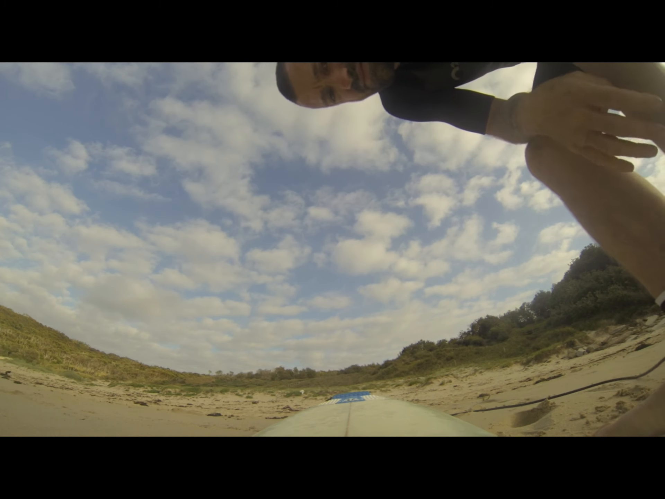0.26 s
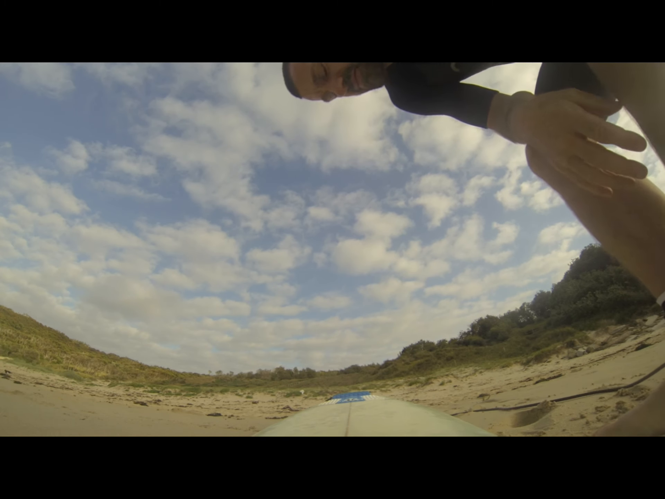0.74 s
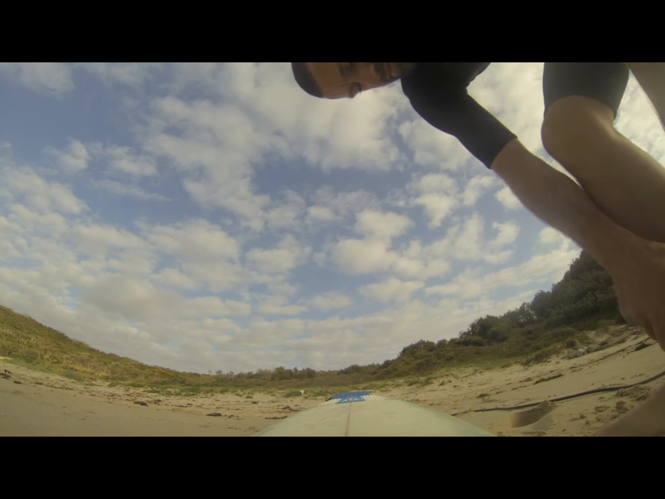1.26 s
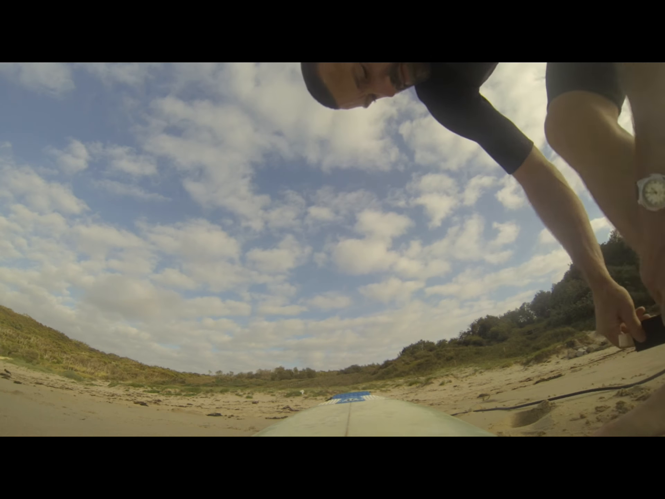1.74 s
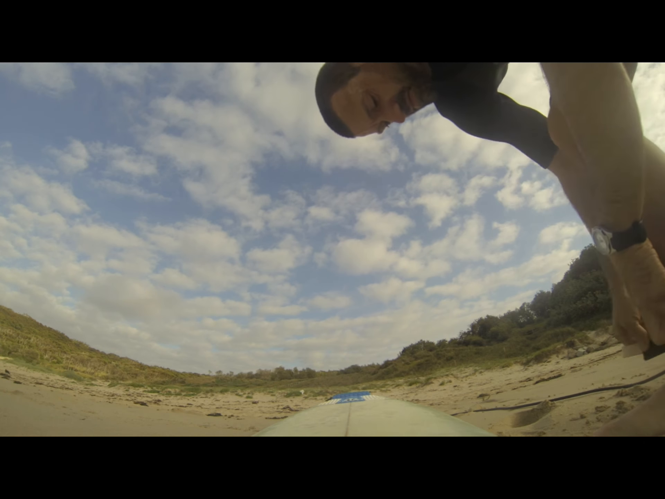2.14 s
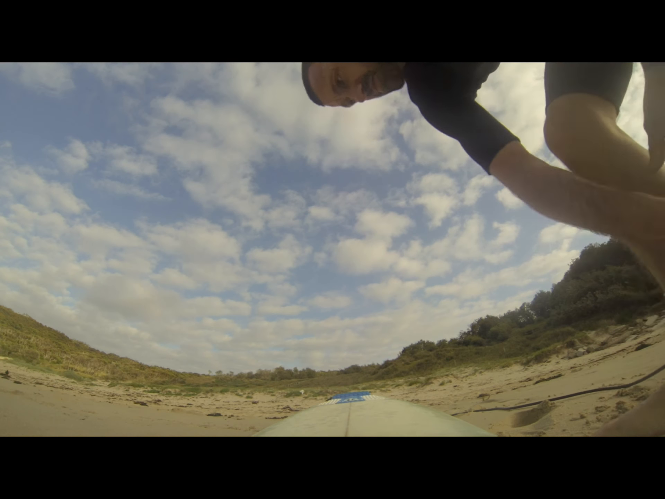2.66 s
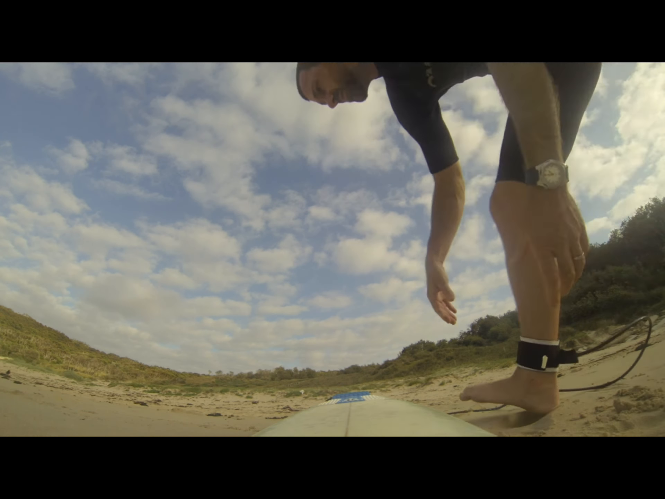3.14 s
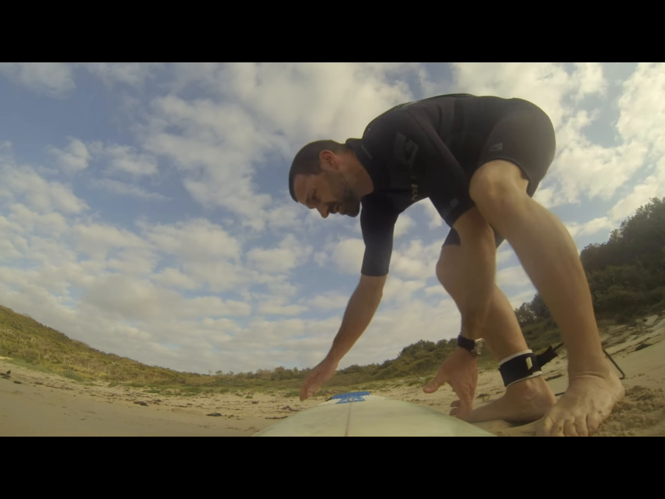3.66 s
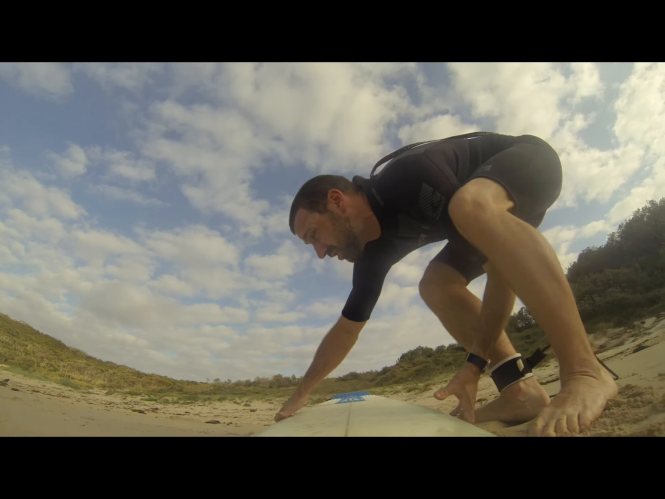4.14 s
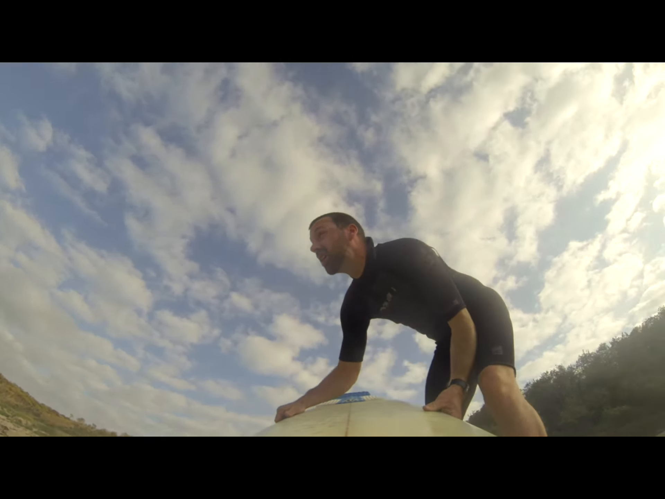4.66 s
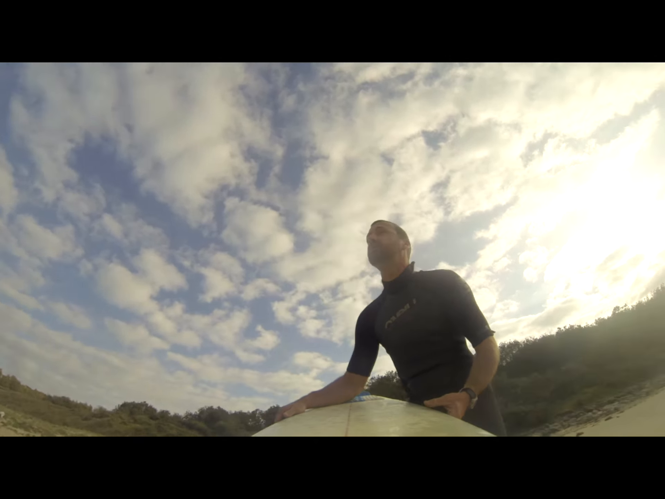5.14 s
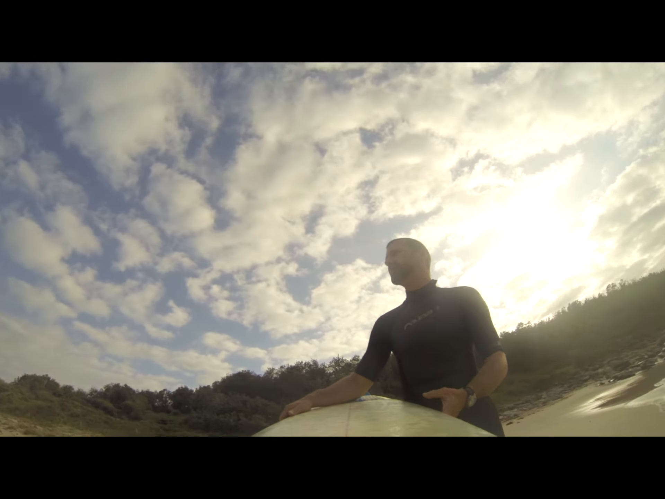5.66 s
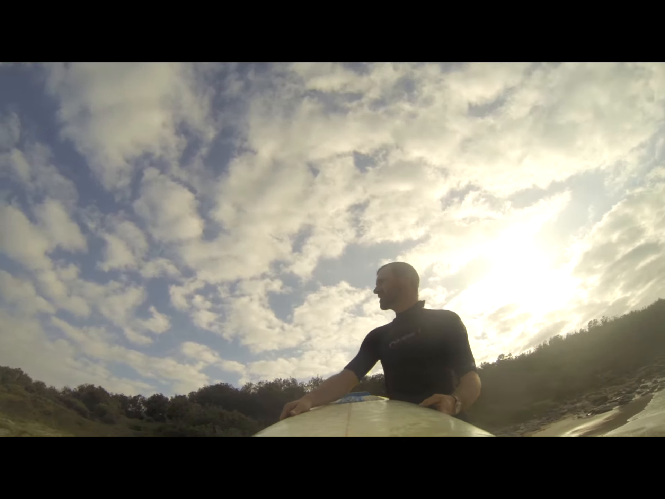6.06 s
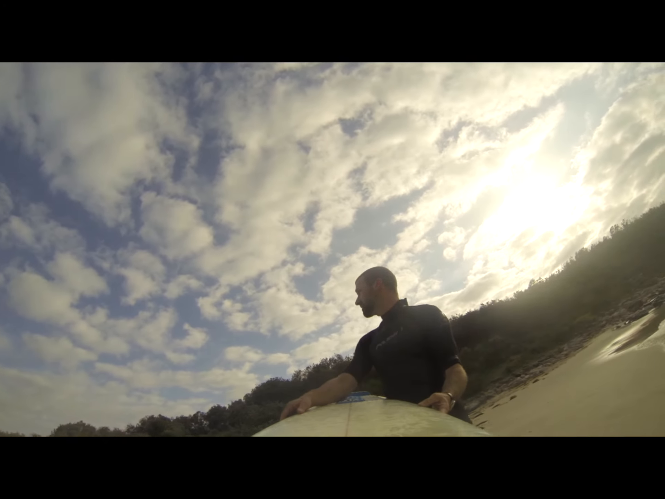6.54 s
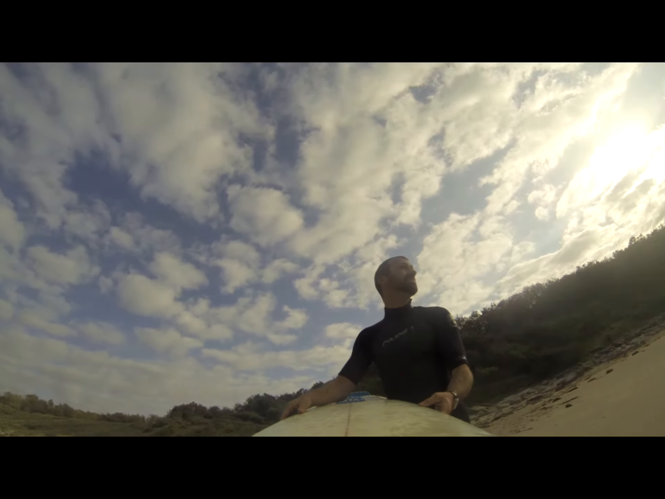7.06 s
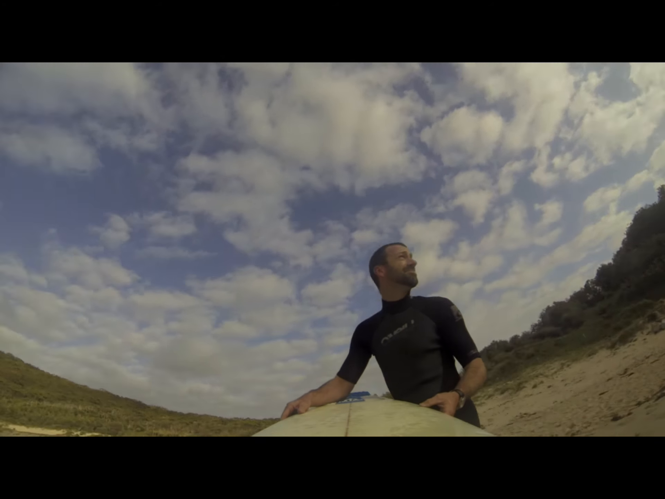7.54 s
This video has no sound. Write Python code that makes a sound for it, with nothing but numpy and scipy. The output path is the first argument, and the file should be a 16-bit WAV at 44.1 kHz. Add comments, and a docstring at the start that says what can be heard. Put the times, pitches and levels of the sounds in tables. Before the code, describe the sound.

Hollow knocks, booming bumps, scrapes and skin squeaks come through a handled surfboard, with low rumble and dull surf behind.

```python
"""First comes a low rumble and a dull wave: a surfboard shakes in the breeze beside the sea.
The surfer fastens his leash with a rasp, lifts the board off the sand and carries it along the surf.
A camera in a sealed case rides on the board, so the waves are muffled, while every bump, knock, scrape
and squeak of the hands comes through loudly. Near the end, a hand rubs and judders on the board.
The hardest hits make the camera's limiter turn everything down for a moment."""
import sys
import numpy as np
from scipy import signal
from scipy.fft import rfft, irfft
from scipy.io import wavfile
from scipy.ndimage import uniform_filter1d, minimum_filter1d

SR = 44100
rng = np.random.default_rng(int(sys.argv[2]) if len(sys.argv) > 2 else 0)


def master_out(mix):
    """Clip the mix to full scale and print it as 16-bit PCM to the path in sys.argv[1]."""
    frames = np.transpose(np.atleast_2d(mix))
    ceiling = np.clip(frames, -1, 1)
    pcm = np.round(ceiling * 32767).astype(np.int16)
    wavfile.write(sys.argv[1], SR, pcm)


N = 343980
TIME = np.arange(N) / SR
FREQS = np.fft.rfftfreq(N, 1 / SR)

# the board shakes in a dying breeze, lies still, then is carried: t/s, level/dB
RUMBLE_LEVELS = [(0, -31), (0.9, -31.5), (1.9, -47), (4.3, -46.5), (4.6, -22.5), (7.8, -30.5)]
# tone colour of that shaking: f/Hz, level/dB
RUMBLE_COLOUR = [(15, 5.5), (30, -11.5), (40, 7.5), (50, -10), (61, -1.5), (75, 12), (92, -11.5), (116, -9),
                 (150, -25.5), (220, -27), (400, -71)]
# breaking waves: crest t/s, rise/s, fall/s, foam lag/s, roar level/dB, wash level/dB, foam level/dB
BREAKERS = [(0.35, 0.45, 0.87, 0.35, -36.5, -45, -58.5), (5.2, 0.43, 0.6, 0.42, -32, -32, -61),
            (6.45, 0.56, 0.76, 0.1, -45.5, -41.5, -64.5), (7.33, 0.5, 0.44, 0.32, -31.5, -37, -60.5)]
# tone colour of the muffled sea: f/Hz, level/dB
SEA_COLOUR = [(140, -1.5), (250, 1.5), (340, -4), (490, 0.5), (660, -7.5), (950, -10.5), (1330, 1),
              (1600, -1.5), (1850, -8), (2400, -18), (3050, -18), (3550, -27), (5100, -31.5), (5800, -36.5),
              (7600, -37.5), (9000, -44.5), (13800, -54), (14800, -51.5)]
# knocks coming through the camera mount: t/s, peak level/dB, tilt/(dB per octave)
MOUNT_KNOCKS = [(0.527, -27, -7), (3.648, -31.5, 1), (3.698, -23.5, 5.5), (3.866, -26.5, 1),
                (3.957, -18, -0.5), (4.133, -14, 1), (4.206, -10.5, -2), (4.27, -11.5, -5.5),
                (4.642, -11, -3.5), (4.931, -11.5, -0.5), (5.092, -9.5, -1.5), (5.475, -6.5, -4),
                (5.955, -10.5, -7), (6.0447, 7, -3.5), (6.712, -8.5, -5)]
# tone colour of the sealed case: f/Hz, level/dB
CASE_COLOUR = [(60, 1.5), (190, -13.5), (380, -1.5), (650, -2), (860, -12.5), (1100, -7), (1400, 7.5),
               (1750, -4.5), (2100, -12), (3100, -25), (3700, -31.5), (7500, -50.5), (11000, -56.5),
               (15000, -70.5)]
# pitches at which the case rings: f/Hz, width/Hz, boost/dB
CASE_RINGS = [(261.6, 33, 13.5), (390, 23, 8.5), (530, 45, 7), (690, 19, 7), (1244, 45, 4.5),
              (1530, 33, 2.5), (1911, 50, 9.5), (2610, 270, 5.5), (2970, 770, 1), (5400, 400, 1)]
# rasps of the leash's hook-and-loop cuff: t/s, length/s, level/dB
CUFF_RASPS = [(1.291, 0.25, -42), (1.512, 0.27, -41.5), (1.624, 0.071, -41.5), (1.766, 0.039, -46.5),
              (1.807, 0.026, -44.5), (2.312, 0.024, -57.5), (2.44, 0.074, -53), (2.535, 0.025, -57)]
# tone colour of the hooks letting go: f/Hz, level/dB
CUFF_COLOUR = [(700, -49), (1400, 14.5), (2000, 7), (3100, 9), (3700, -4), (5000, -0.5), (7500, -6),
               (10000, -13), (14000, -22), (16000, -28)]
# bumps on the board: t/s, push level/dB, push f/Hz, ring level/dB
BOARD_BUMPS = [(3.219, -23.5, 65, -21.5), (3.658, -18, 62.2, -15), (3.898, -12, 33, -6.5),
               (3.952, -0.5, 25, -6.5), (4.075, 2, 53, 0), (4.214, 2.5, 50.6, -5.5),
               (4.268, 6.5, 60.5, -0.5), (4.716, -22, 54.4, -2), (5.158, -2.5, 62.7, -10),
               (6.03, 0, 51.4, -9.5), (6.106, 0, 66.5, -1.5), (6.747, -18, 44.5, -8.5),
               (6.884, 4.5, 64.4, 4), (7.173, -17, 44.5, -11), (7.63, -22, 58.4, -6)]
# low notes of the bending board: f/Hz, time to fade by 60 dB/s, level/dB
BOARD_NOTES = [(48.94, 0.88, 0.5), (75.47, 0.58, -1), (117, 0.31, -9.5)]
# sand and hands scraping the board: t/s, length/s, level/dB, tilt/(dB per octave)
BOARD_SCRAPES = [(3.638, 0.095, -40, -14), (3.712, 0.043, -39, 8), (3.89, 0.1, -33.5, -3.5),
                 (4.031, 0.16, -30.5, 1), (4.119, 0.13, -23, -6.5), (4.73, 0.0348, -23.5, -2),
                 (5.039, 0.075, -24.5, 4), (5.123, 0.127, -26, -14.5), (5.412, 0.047, -24.5, -8),
                 (5.939, 0.15, -28, -4), (6.857, 0.072, -21.5, -3), (6.945, 0.079, -20.5, -2.5),
                 (7.001, 0.16, -18, -3.5)]
# skin squeaking on the deck: t/s, length/s, first f/Hz, middle f/Hz, last f/Hz, level/dB, roughness 0-1
SKIN_SQUEAKS = [(4.641, 0.055, 480, 442, 433, -25.5, 0.41), (5.087, 0.023, 1500, 1500, 1410, -18, 0.36),
                (5.09, 0.21, 600, 305, 251.3, -19, 0.45), (7.056, 0.072, 686.5, 707, 690, -17, 0.21),
                (7.144, 0.0608, 735, 672, 766, -17, 0.15), (7.202, 0.0267, 1295, 1466, 1630, -13, 0.28)]
# a hand juddering on the board: t/s, length/s, level/dB
HAND_RUBS = [(6.664, 0.0844, -21), (6.758, 0.05, -32), (7.389, 0.065, -29.5), (7.63, 0.2, -21),
             (7.678, 0.046, -19)]
# tone colour of those rubs: f/Hz, level/dB
RUB_COLOUR = [(110, 0.5), (190, -12), (400, 4), (690, -2), (860, -13), (1100, -4), (1450, -1.5),
              (1850, -19), (2200, -26), (4000, -68)]


def amp(db):
    """Turns decibels into a number to multiply a sound by."""
    return 10 ** (np.asarray(db) / 20)


def unit(x):
    """Scales a signal to an average strength (rms) of 1."""
    return x / np.sqrt(np.mean(x ** 2) + 1e-20)


def colour_db(colour, hz):
    """Looks up levels in a tone colour table, sliding smoothly between its rows."""
    row_hz, row_db = np.transpose(colour)
    return np.interp(np.log(hz + 1), np.log(row_hz), row_db)


def coloured(x, colour):
    """Gives a sound the tone colour of a table."""
    return unit(irfft(rfft(x) * amp(colour_db(colour, FREQS)), N))


def band(x, low_hz, high_hz):
    """Keeps what lies between two frequencies."""
    cut = (1 + (low_hz / (FREQS + 1)) ** 12) * (1 + (FREQS / high_hz) ** 12)
    return irfft(rfft(x) / np.sqrt(cut), N)


def wobble(rate_hz):
    """A smooth random curve that wanders up to about this fast."""
    return unit(irfft(rfft(rng.standard_normal(N)) / (1 + (FREQS / rate_hz) ** 4), N))


def clicks(per_s, spread_db):
    """Random clicks of uneven size."""
    size = amp(spread_db * np.minimum(rng.exponential(1, N), 4))
    return size * rng.choice([-1, 1], N) * (rng.random(N) < per_s / SR)


def burst(x, start, length, db, taper):
    """A short piece of a sound at a set level; taper is the share spent fading in and out."""
    part = x[round(start * SR):][:round(length * SR)]
    return amp(db) * unit(part * signal.windows.tukey(len(part), taper))


def add(mix, start, sound):
    """Mixes a sound in at a start time in seconds."""
    part = mix[max(round(start * SR), 0):][:len(sound)]
    part += sound[:len(part)]


def rumble(buffet_db=1.3):
    """The board shudders unevenly in the wind and in the surfer's grip."""
    level_db = np.interp(TIME, *np.transpose(RUMBLE_LEVELS)) + buffet_db * wobble(rate_hz=6)
    return coloured(rng.standard_normal(N), RUMBLE_COLOUR) * amp(level_db)


def case_echo(x, echo, notch_hz=895):
    """Sound from the air meets its upside-down echo in the case, which dips evenly spaced pitches."""
    reflection = echo / (1 + (FREQS / 9000) ** 4) * np.exp(-2j * np.pi * FREQS / notch_hz)
    return irfft(rfft(x) * (1 - reflection), N)


def swell(far_db, crests_db, lags, rise_stretch=1, drop_db=10):
    """A loudness curve: each wave builds to its crest and dies away over the steady, distant surf."""
    power = amp(far_db) ** 2
    for (crest, rise, fall, *_), db, lag in zip(BREAKERS, crests_db, lags):
        t = TIME - crest - lag
        from_crest = abs(t) / np.where(t < 0, rise * rise_stretch, fall)
        power = power + amp(db - drop_db * from_crest ** 2.02) ** 2
    return np.sqrt(power)


def sea():
    """Waves break: a low wash and a roar, then spray, and last the hiss of foam."""
    *_, foam_lags, roar_db, wash_db, foam_db = np.transpose(BREAKERS)
    no_lag = np.zeros(len(BREAKERS))
    water = case_echo(coloured(rng.standard_normal(N), SEA_COLOUR), echo=0.3)
    wash_churn, roar_churn, hiss_churn = amp(1.4 * wobble(20)), amp(.9 * wobble(24)), amp(.6 * wobble(25))
    wash = unit(band(water, 85, 810)) * swell(-50, wash_db, no_lag)
    roar = unit(band(water, 870, 2370)) * swell(-54, roar_db, no_lag)
    spray = unit(band(water, 2500, 4320)) * swell(-69.5, foam_db + 5, 0.3 * foam_lags, rise_stretch=1.4)
    foam = unit(band(water, 4650, 16000)) * swell(-75.5, foam_db, foam_lags, rise_stretch=1.4)
    return wash * wash_churn + roar * roar_churn + (spray + foam) * hiss_churn


def electronics(whine_hz=10645):
    """The camera's own faint whine and hiss."""
    whine = amp(-81) * np.sin(2 * np.pi * whine_hz * TIME)
    hiss = amp(-74) * unit(band(rng.standard_normal(N), 200, 10000))
    return whine + hiss


def case_ring(tilt_db, size=4096):
    """How the case rings after one sharp tap; a higher tilt (dB per octave) makes it brighter."""
    hz = np.fft.rfftfreq(size, 1 / SR)
    peaks_db = sum(boost / (1 + (2 * (hz - f) / width) ** 2) for f, width, boost in CASE_RINGS)
    octaves = np.log2(np.clip(hz, 300, 6000) / 1000)
    db = colour_db(CASE_COLOUR, hz) + peaks_db + tilt_db * octaves
    log_gain = np.log(amp(np.r_[db, db[-2:0:-1]]))
    spectrum = np.exp(np.conj(signal.hilbert(log_gain)))  # puts all the ringing after the tap
    return np.fft.ifft(spectrum).real[:size // 2]


def knocks(rattle=0.18, rattle_s=0.0031, slip_db=-13.5, slip_s=0.0045):
    """The grip slips, then the mount clicks and briefly rattles; all of it rings the case."""
    out, t = np.zeros(N), np.arange(-1024, 1024) / SR
    chatter = rattle * np.where(t < 0, amp(slip_db) * np.exp(t / slip_s), np.exp(-t / rattle_s))
    for start, db, tilt_db in MOUNT_KNOCKS:
        contact = (t == 0) + chatter * rng.standard_normal(len(t))
        knock = signal.fftconvolve(contact, case_ring(tilt_db))
        add(out, start + t[0], amp(db) * knock / abs(knock).max())
    return out


def cuff():
    """The leash cuff rasps as its tiny hooks let go in clumps."""
    hooks = clicks(per_s=3000, spread_db=2.7) * amp(2.4 * wobble(90))
    snaps = case_echo(coloured(hooks, CUFF_COLOUR), echo=0.42)
    out = np.zeros(N)
    for start, length, db in CUFF_RASPS:
        add(out, start, burst(snaps, start, length, db, taper=0.55))
    return out


def bumps(slow_hz=31.4, quick_hz=68.6):
    """Bumps and steps push the board, which springs back and rings: low if slow, higher if quick."""
    out, t = np.zeros(N), TIME[:SR]
    lowest, *upper = (amp(db - 60 * t / fade_s) * np.sin(2 * np.pi * hz * t)
                      for hz, fade_s, db in BOARD_NOTES)
    fade_in = 1 - np.exp(-t / 0.025)
    for start, push_db, push_hz, ring_db in BOARD_BUMPS + steps():
        cycles = t * push_hz
        push = np.sin(2 * np.pi * cycles) * (2 * cycles * np.exp(1 - 2 * cycles)) ** 2
        push = (push + push ** 3) / 1.5  # the push stiffens at its peaks
        quickness = np.clip((push_hz - slow_hz) / (quick_hz - slow_hz), 0, 1)
        ring = fade_in * ((1 - quickness) * lowest + quickness * sum(upper))
        add(out, start, amp(push_db) * push + amp(ring_db) * ring)
    return out


def overload_ticks(delay_s=0.0026, length_s=0.018, below_push_db=38.5):
    """A bright, brief crackle as a bump overloads the camera: the harder the push, the louder."""
    out = np.zeros(N)
    crackle = signal.fftconvolve(clicks(per_s=1500, spread_db=3), case_ring(tilt_db=13))
    for start, push_db, *_ in BOARD_BUMPS:
        add(out, start + delay_s, burst(crackle, start, length_s, push_db - below_push_db, taper=0.65))
    return out


def scrapes(swell_db=6.5):
    """Many tiny slips ring the case, growing louder as the hand presses; soft skin sounds duller."""
    out, slips = np.zeros(N), band(clicks(per_s=2400, spread_db=2.5), 110, 4640)
    for start, length, db, tilt_db in BOARD_SCRAPES:
        rub = burst(slips, start, length, db=0, taper=0.35)
        pressure = amp(np.linspace(0, swell_db, len(rub)))
        scrape = signal.fftconvolve(rub * pressure, case_ring(tilt_db))
        strength = np.sqrt(np.sum(scrape ** 2) / (length * SR))
        add(out, start, amp(db) * scrape / strength)
    return out


def squeaks(soft_hz=1750, rise_db=1):
    """Skin sticks and slips fast enough to make a shaky, gliding note; the case colours its overtones."""
    out, jitter, flutter, ring = np.zeros(N), wobble(166), wobble(120), case_ring(tilt_db=-4)
    for start, length, *pitches, db, rough in SKIN_SQUEAKS:
        span = round(start * SR) + np.arange(round(length * SR))
        progress = np.linspace(0, 1, len(span))
        arc = np.polyfit([0, 0.5, 1], np.log(pitches), 2)  # one curve through the three pitches
        hz = np.exp(np.polyval(arc, progress))
        cycles = np.cumsum(hz * (1 + 0.24 * rough * jitter[span])) / SR
        slips = sum(np.sin(2 * np.pi * k * cycles) / k ** 1.14 / (1 + (k * hz / soft_hz) ** 6)
                    for k in range(1, 5))
        tone = signal.fftconvolve(slips, ring)[:len(span)]
        tone /= np.sqrt(abs(uniform_filter1d(tone ** 2, size=440)) + 1e-9)  # evens out the loudness
        level_db = db + rise_db * (progress - 0.5) + 2 * rough * flutter[span]
        add(out, start, tone * amp(level_db) * signal.windows.tukey(len(span), 0.27))
    return out


def steps(first_s=4.895, every_s=0.497, push_db=-19, push_hz=46.5, ring_db=-5):
    """Six evenly paced footsteps jolt the board; each is listed as a soft bump."""
    return [(first_s + k * every_s, push_db, push_hz, ring_db) for k in range(6)]


def rubs():
    """A hand rubs and judders on the board in dull, uneven crackles."""
    out, judder = np.zeros(N), coloured(clicks(per_s=1800, spread_db=2.6), RUB_COLOUR)
    for start, length, db in HAND_RUBS:
        add(out, start, burst(judder, start, length, db, taper=0.28))
    return out


def scene():
    """Adds beach, board and camera together in one channel."""
    mix = sea() + cuff() + rumble() + rubs() + bumps() + overload_ticks()
    return (mix + scrapes() + knocks() + squeaks() + electronics())[None]


def record(dry, ceiling_db=-6.5, hold_s=0.16, recovery_db_per_s=85, top_hz=15100):
    """A limiter turns loud moments down, waits and lets go; then peaks are rounded and top treble cut."""
    level_db = 20 * np.log10(abs(uniform_filter1d(abs(dry[0]), size=180)) + 1e-9)
    half_hold = int(hold_s * SR / 2)
    held_db = -minimum_filter1d(-level_db, 2 * half_hold + 1, origin=half_hold)  # loudest recent level
    recovery_db = TIME * recovery_db_per_s
    falling_db = np.maximum.accumulate(held_db + recovery_db) - recovery_db
    excess_db = np.maximum(falling_db - ceiling_db, 0)
    cut_db = uniform_filter1d(uniform_filter1d(excess_db, size=110), size=110)
    limited = dry / amp(cut_db)
    rounded = limited / (1 + limited ** 6) ** (1 / 6)
    treble_cut = signal.firwin(255, top_hz, window=("kaiser", 9), fs=SR)
    return signal.oaconvolve(rounded, treble_cut[None], "same")


dry = scene()
out = record(dry)
master_out(out)
```